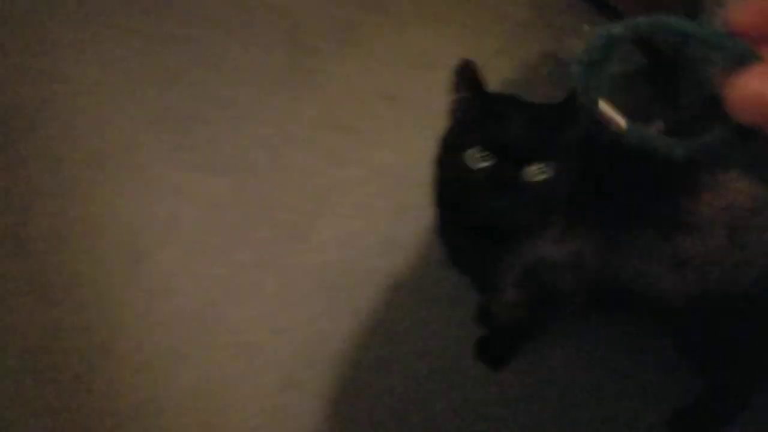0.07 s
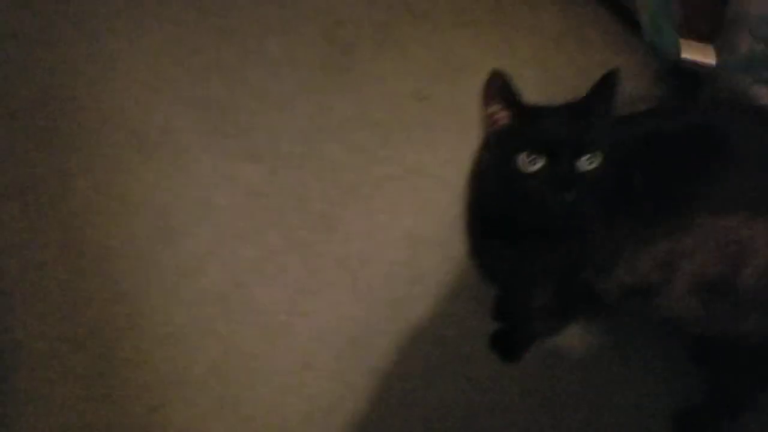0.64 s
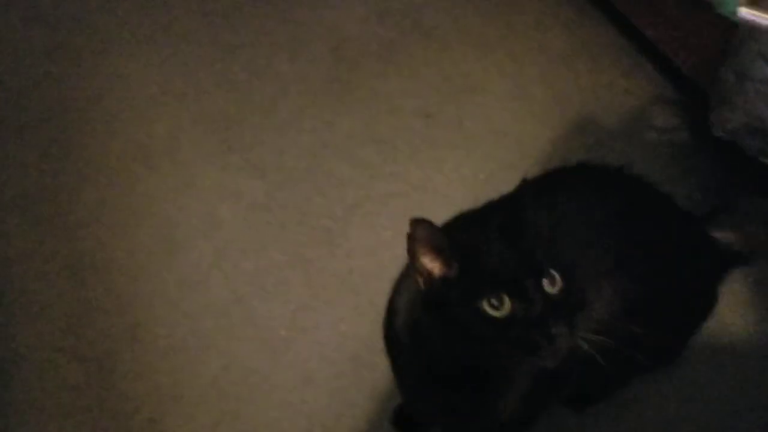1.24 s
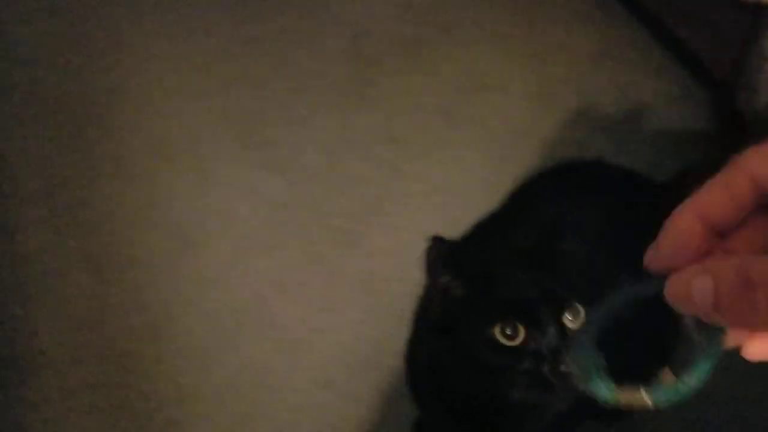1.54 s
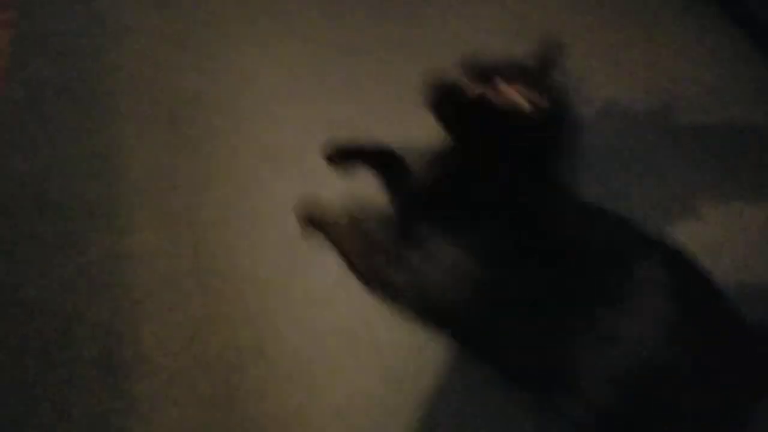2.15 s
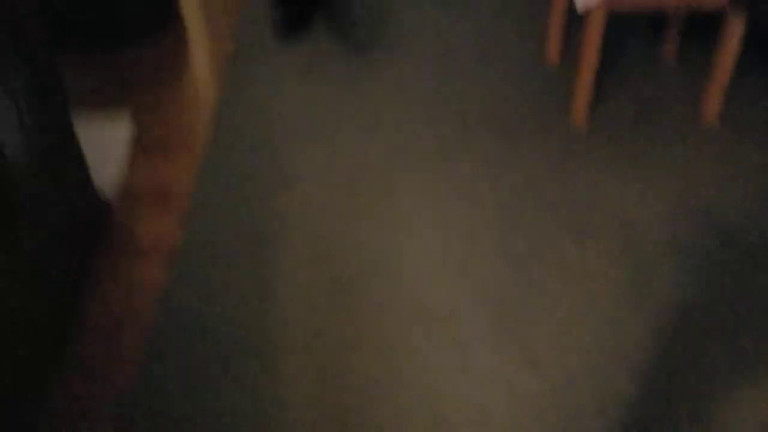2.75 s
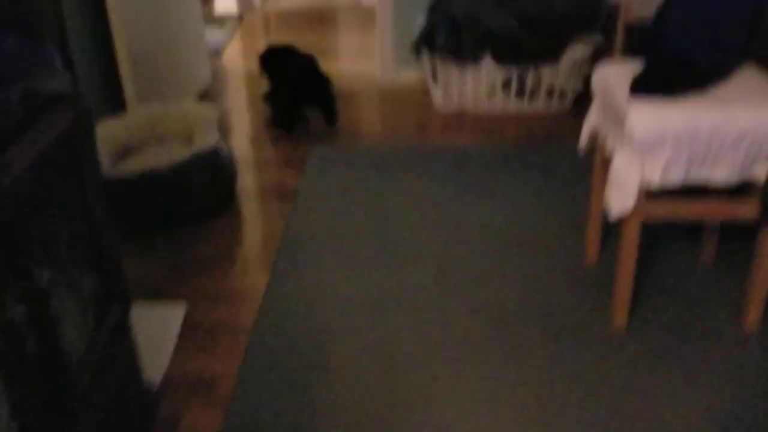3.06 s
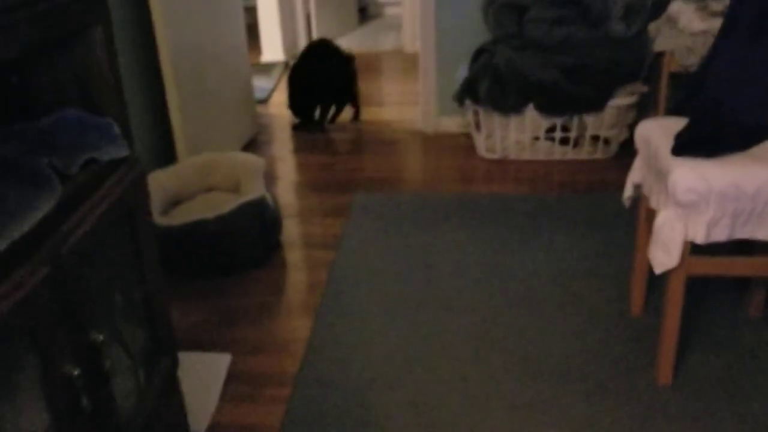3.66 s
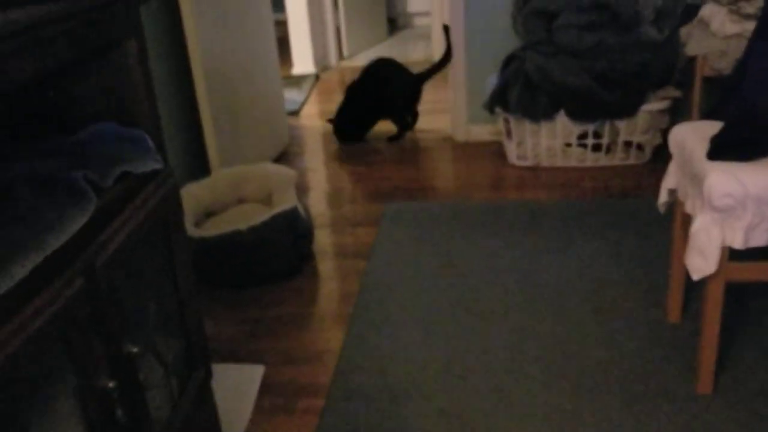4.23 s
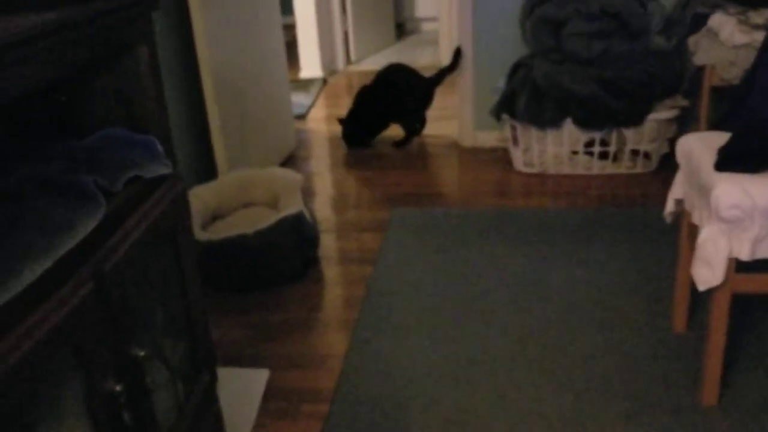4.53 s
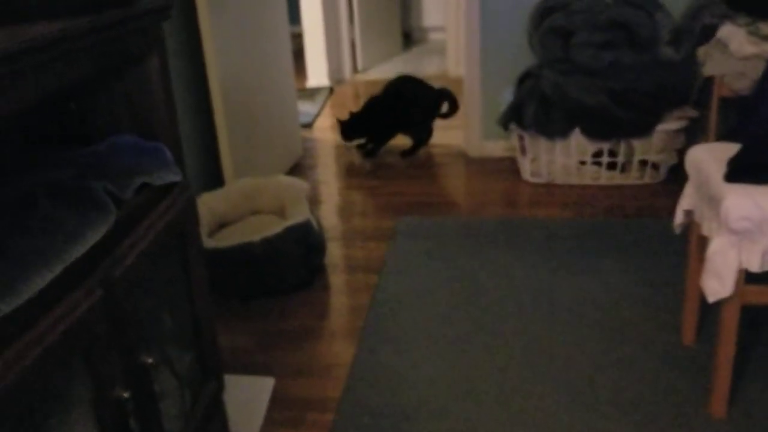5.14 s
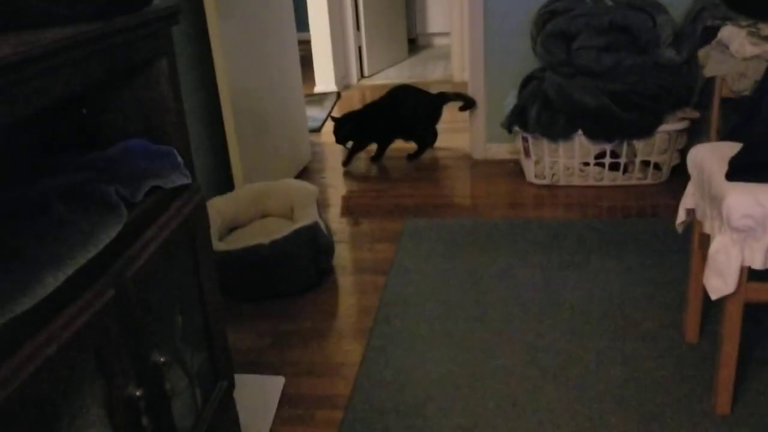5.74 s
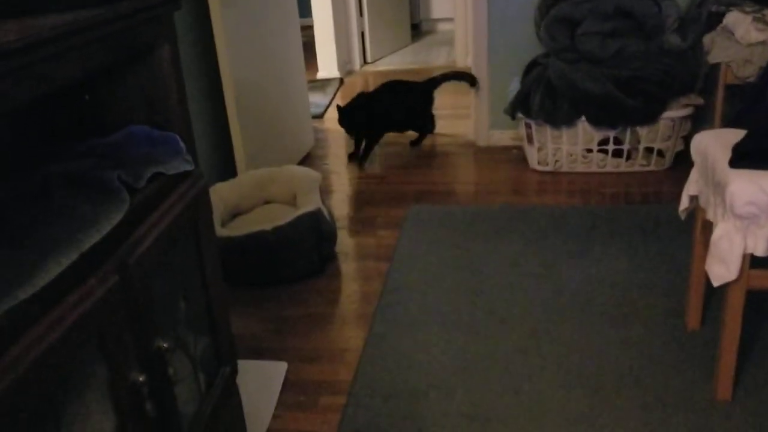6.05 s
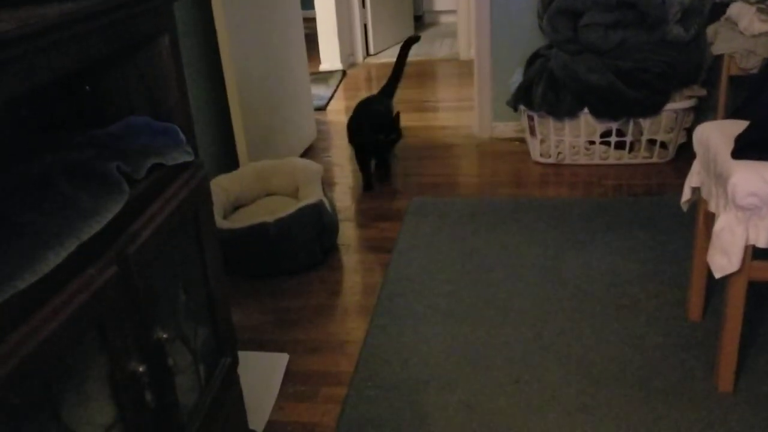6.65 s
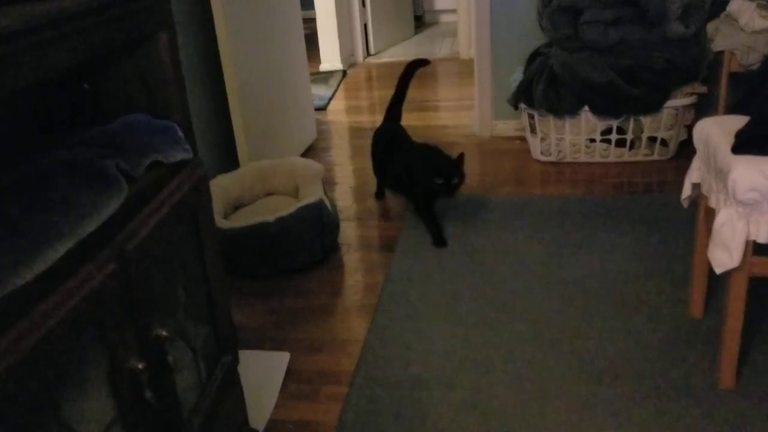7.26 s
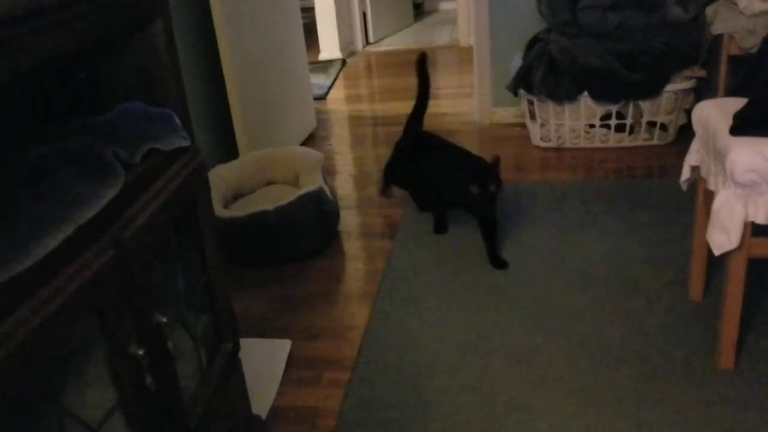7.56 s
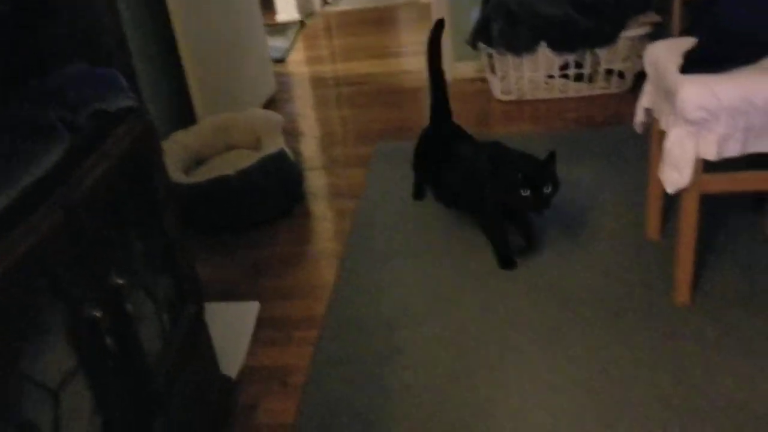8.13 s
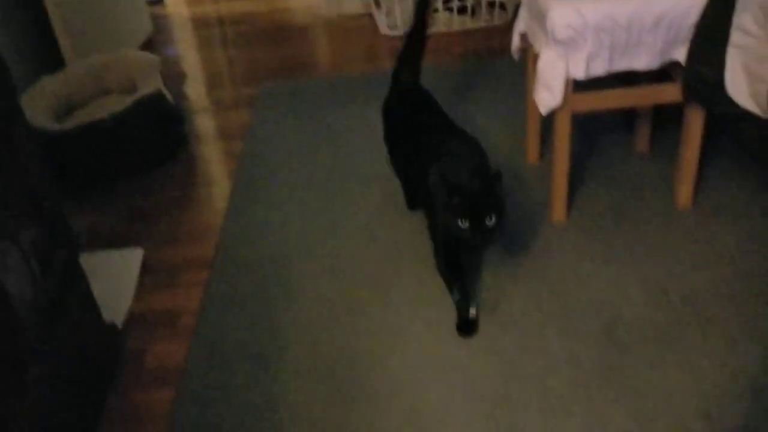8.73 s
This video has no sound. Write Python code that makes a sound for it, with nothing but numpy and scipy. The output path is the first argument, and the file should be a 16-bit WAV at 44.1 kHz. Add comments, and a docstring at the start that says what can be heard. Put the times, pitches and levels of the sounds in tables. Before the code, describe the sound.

In a small, quiet living room a cat gives one short, falling chirp that ends in a rasp. A moment later it gallops across booming floorboards with knocks and clicks, and a thrown toy clacks onto the wood. Clothing rustles close to the hand-held stereo microphone. The cat then pads back with a few soft thumps and faint squeaks over a low hum.

```python
"""A cat chirps once, then gallops over booming floorboards as a thrown toy clacks down.
The chirp, at the toy held above the carpet, is a falling vocal-fold tone shaped by the mouth; it ends in rasp.
Paws set the boards swinging, the toy rings briefly, and the cat pads back among a few soft knocks.
Cloth rustle, faint squeaks, a far whine and a low hum fill a small, quiet living room,
heard through a hand-held stereo microphone."""
import sys
import numpy as np
from scipy import signal
from scipy.fft import rfft, irfft, next_fast_len
from scipy.io import wavfile

SR = 44100
rng = np.random.default_rng(int(sys.argv[2]) if len(sys.argv) > 2 else 0)


def to_wav(s):
    """Save 16-bit WAV."""
    ch = np.atleast_2d(s).T  # columns
    pcm = np.round(np.clip(ch, -1, 1) * 32767)  # PCM
    wavfile.write(sys.argv[1], SR, pcm.astype(np.int16))


N = 387638
TIME = np.arange(N) / SR

# woody knock spectrum (frequency / centre, density [dB])
KNOCK_SPECTRUM = [(.2, -3.5), (.6, -3.5), (.87, 0), (1, 4), (1.15, -0.5), (1.6, -13), (3, -27), (12, -74)]


def chirp(jitter=0.072, shimmer_db=3.5, rasp_db=-4, crack_ratio=1.42, mouth_db=10, mouth_width_hz=330):
    """Vocal folds glide down as the mouth opens and closes; they flutter early and break up at the end."""
    # throat and mouth response (frequency [Hz], gain [dB])
    throat = [(400, -20), (660, -8), (1000, -15), (1350, -11.5), (1800, 4), (2020, 2.5), (2350, -12),
              (2700, -15), (3200, -26), (3850, -22), (4500, -26), (6000, -17), (7300, -33.5), (15000, -55)]
    # fold pitch: sags, lifts at the break (time [s], pitch [Hz])
    pitch_curve = [(0.912, 746), (0.924, 730.5), (0.94, 677), (0.948, 692), (0.996, 650), (1.014, 614),
                   (1.038, 609), (1.052, 638.6), (1.075, 657)]
    # upper mouth resonance, moved by the jaw (time [s], frequency [Hz])
    mouth_curve = [(.912, 4550), (.924, 3570), (.95, 3450), (.966, 5100), (.98, 5230), (.99, 3950),
                   (1.016, 3660), (1.04, 5900)]
    wobble_hz, wobble_depth = 38.7, 0.017
    main_hz, main_width_hz, closed_db = 1960, 240, -16
    live, level, rough, bright_db = voice_controls()
    wobble = wobble_depth * np.cos(2 * np.pi * wobble_hz * (TIME - 0.87))
    pitch_hz = in_time(pitch_curve)[0] * (1 + wobble)
    jittered_hz = pitch_hz * (1 + jitter * rough * drift(700))
    phase = 2 * np.pi * np.cumsum(jittered_hz[live]) / SR
    k = np.arange(1, 23)[:, None]
    hz = k * pitch_hz[live]
    mouth_hz = in_time(mouth_curve)[0][live]
    lift_db = mouth_db / (1 + ((hz - mouth_hz) / mouth_width_hz) ** 2)
    # main resonance muffled until the mouth opens
    closed = 1 - step_up(0.93, 0.0058)[live]
    lift_db += closed_db * closed * np.exp(-((hz - main_hz) / main_width_hz) ** 2)
    upper = at_hz([(2200, 0.081), (3000, 0.88)], hz)
    shimmer = np.array([drift(54.95)[live] for _ in k])
    gains = from_db(at_hz(throat, hz) + lift_db + upper * (bright_db[live] + shimmer_db * shimmer))
    gains /= np.sqrt(np.sum(gains ** 2, axis=0) / 2)
    tone = np.sum(gains * np.sin(k * phase + rng.uniform(0, 2 * np.pi, k.shape)), axis=0)
    # brighter turbulence, one puff per fold opening
    air_spectrum = [(f, db + 9 * (f > 3000)) for f, db in throat]
    air = noise(air_spectrum, N)[0][live] * (1 + np.cos(phase))
    # in the rasp, a wavering tone between the harmonics takes over
    crack_phase = crack_ratio * phase + 0.7 * drift(300)[live]
    crack = from_db(-1) * swell(1.059, 0.011)[live] * np.sqrt(2) * np.sin(crack_phase)
    voice = np.zeros(N)
    voice[live] = tone * (1 - 0.85 * rough[live]) + from_db(rasp_db) * rough[live] * air + crack
    return voice_in_room(voice * level)


def voice_controls(start_s=0.909, end_s=1.068, attack_s=0.0084, release_t60_s=0.13, trill_hz=31.5):
    """The throbbing call catches briefly, runs clear, then breaks and dies; rougher is brighter."""
    # vocal effort (time [s], level [dB])
    effort = [(.914, -45.5), (.943, -41), (.957, -35.5), (.97, -33.5), (1.01, -37.5), (1.038, -42.5),
              (1.068, -48)]
    live = (TIME > start_s) & (TIME < end_s + release_t60_s)
    flutter = swell(0.936, 0.0063)
    broken = step_up(1.043, 0.0051)
    rough = np.clip(0.078 + 0.25 * flutter + broken, 0, 1)
    bright_db = -2 + 18 * flutter + 3 * broken
    attack = np.clip((TIME - start_s) / attack_s, 0, 1)
    release = fade(np.maximum(TIME - end_s, 0), release_t60_s)
    trill_db = 2 * np.cos(2 * np.pi * trill_hz * (TIME - 0.969))
    level = from_db(in_time(effort)[0] + trill_db) * attack * release
    return live, level, rough, bright_db


def voice_in_room(voice, room_db=-22.5, treble_room_db=-14.5):
    """Direct voice, early echoes and tail; small surfaces return only the treble."""
    # echoes off floor, legs and furniture (delay [s], gain [dB])
    echoes = [(.0011, -32), (.0029, -4.5), (.0053, -16), (.0094, -15)]
    treble = signal.sosfilt(signal.butter(2, 2800, "high", fs=SR, output="sos"), voice + 1e-18)
    early = sum(from_db(db) * delayed(treble, lag_s) for lag_s, db in echoes)
    tail = from_db(room_db) * room(voice) + from_db(treble_room_db) * room(treble)
    return head_on(voice + early, left_db=6.5, shade_hz=3800) + tail * pan(6.4)


def footfalls(push_s=0.0053, hollow_hz=199, hollow_t60_s=0.28, hollow_rise_s=0.0022, firm_db=-29):
    """Paws set the boards swinging at a pitch that depends on the spot; firm steps add a hollow note."""
    # paw impacts (time [s], board pitch [Hz], level [dB], t60 [s])
    steps = [(1.899, 76, -35.5, 0.12), (1.942, 70, -38, 0.14), (2.022, 66, -34, 0.12),
             (2.076, 85, -37.5, .12), (2.287, 212, -41, 0.17), (2.367, 104, -31, 0.074),
             (2.432, 142, -34.5, 0.19), (2.464, 56.8, -34, 0.26), (2.578, 175, -38.5, 0.19),
             (2.655, 91, -36.5, 0.27), (2.666, 55.1, -35, 0.55), (2.751, 101, -35.5, 0.22),
             (2.843, 109.6, -29, 0.48), (2.904, 110.6, -23.5, 0.28), (2.976, 100.8, -28.5, 0.31),
             (3.024, 116, -32, 0.12), (3.484, 215, -52.5, 0.21), (3.903, 201, -51, .25),
             (4.115, 184, -53.5, .15), (6.142, 112.4, -40, 0.3), (6.698, 100, -43, 0.19),
             (7.06, 99, -44.5, .11), (7.414, 91, -42.5, 0.25), (8.187, 73.5, -40.5, 0.13)]
    out, t = np.zeros((2, N)), TIME[:SR // 2]
    for s, hz, db, t60_s in steps:
        boom = from_db(db) * np.sin(2 * np.pi * hz * t) * fade(t, t60_s) * rise(t, push_s)
        hollow_db = -41 + 1.56 * min(db - firm_db, 0)
        hollow = from_db(hollow_db) * burst(KNOCK_SPECTRUM, hollow_hz, hollow_t60_s, t)
        add(out, s, boom + hollow * rise(t, hollow_rise_s))
    return from_left(out * pan(4.4), lag_s=0.00013)


def knocks(knock_t60_s=0.21, slap_t60_s=0.34, rise_s=0.0012, second_touch_s=0.022, second_touch_db=-7):
    """Each contact: a woody knock under a brighter slap, then a lighter second touch."""
    # hard paw contacts, soft knocks about the room (time [s], knock [Hz], knock [dB], slap [Hz], slap [dB])
    contacts = [(1.875, 394, -44.5, 890, -52), (2.288, 320, -54.5, 1140, -54.5),
                (2.347, 293, -42, 600, -68), (2.407, 565, -46.5, 1140, -46.5), (2.654, 830, -50, 1350, -54),
                (2.838, 210, -44, 1200, -58), (2.906, 592, -46, 700, -58), (3.025, 299, -47, 1030, -54),
                (6.807, 910, -79, 2200, -64), (7.961, 477, -61, 1380, -57.5),
                (8.617, 536, -55, 1350, -58.5)]
    # slap spectrum (frequency / centre, density [dB])
    slap_spectrum = [(.15, 0.5), (.5, 5.5), (1, -1), (1.5, -6), (2.2, -11.5), (3.2, -16), (6, -25),
                     (9, -49), (16, -41)]
    out, t = np.zeros((2, N)), TIME[:SR // 2]
    for s, knock_hz, knock_db, slap_hz, slap_db in contacts:
        for late_s, touch_db in ((0, 0), (second_touch_s, second_touch_db)):
            knock = from_db(knock_db) * burst(KNOCK_SPECTRUM, knock_hz, knock_t60_s, t)
            slap = from_db(slap_db) * burst(slap_spectrum, slap_hz, slap_t60_s, t)
            add(out, s + late_s, from_db(touch_db) * (knock + slap) * rise(t, rise_s))
    return from_left(out * pan(4.4), lag_s=0.0002)


def toy(contact_t60_s=0.018, ring_db=-9, ring_t60_s=0.25, room_db=-5):
    """The toy hits bare boards; its many close modes ring briefly."""
    # landing and bounces (time [s], level [dB])
    hits = [(2.826, -37.5), (2.8327, -38), (2.837, -42)]
    # clack spectrum (frequency [Hz], density [dB])
    spectrum = [(300, -14), (550, 6.5), (900, -11), (1100, -5), (1600, -23), (2350, 2), (3300, 0),
                (4200, 0.5), (4900, -7), (6200, 5.5), (8200, -12), (10000, -4.5), (11300, -16),
                (13000, -2.5), (16000, -14)]
    out, t = np.zeros((2, N)), TIME[:SR // 3]
    envelope = fade(t, contact_t60_s) + from_db(ring_db) * fade(t, ring_t60_s)
    for s, db in hits:
        add(out, s, from_db(db) * noise(spectrum, len(t)) * envelope)
    return out * pan(7.9) + from_db(room_db) * room(out) * pan(7.8)


def clicks(t60_s=0.0096, room_db=-8):
    """Small hard contacts, each a few milliseconds of broad resonance."""
    # mouth, claw and toy clicks (time [s], level [dB], tilt [dB/octave])
    contacts = [(0.812, -54, -5), (1.958, -56.5, 2), (1.999, -57, 8), (2.134, -48.5, 1.5), (2.213, -53, 5),
                (2.2773, -40.5, -6), (2.2799, -32.5, -1.5), (2.395, -52, -18), (2.4081, -48, -1.5)]
    # click spectrum before tilt (frequency [Hz], density [dB])
    spectrum = [(400, -28), (1000, -14.5), (1900, 1.5), (3000, -2.5), (3900, -1), (5500, 1.5), (7000, -12),
                (9000, -23), (15000, -18)]
    out, t = np.zeros(N), TIME[:SR // 20]
    for s, db, tilt_db in contacts:
        tilted = [(hz, density_db + tilt_db * np.log2(hz)) for hz, density_db in spectrum]
        add(out, s, from_db(db) * burst(tilted, 1, t60_s, t)[0])
    return head_on(out, left_db=11.0, shade_hz=4500) + from_db(room_db) * room(out) * pan(8.5)


def rustle(grain_db=1.1):
    """Cloth slides in fine grains close to the left port."""
    # clothing moving with the throw (time [s], level [dB])
    levels = [(0, -70.5), (.35, -79), (.8, -70.5), (1.68, -70), (2.05, -59.5), (2.6, -69.5), (3.02, -53.5),
              (3.33, -63), (3.52, -73.5), (3.66, -67.5), (3.85, -83), (8.2, -83.5), (8.79, -76)]
    # cloth spectrum (frequency [Hz], density [dB])
    spectrum = [(400, 4.5), (1200, -4), (2300, -1), (3300, -8.5), (4500, -1.5), (6200, -1), (8000, -12.5),
                (11000, -13.5), (16000, -9)]
    return noise(spectrum, N) * from_db(in_time(levels)[0] + grain_db * drift(180)) * from_db([[0], [-10]])


def squeaks(flutter_db=2.0):
    """Uneven friction swells and fades in one narrow resonance."""
    # faint squeaks and scuffs (time [s], length [s], frequency [Hz], level [dB], sharpness)
    scuffs = [(1.235, 0.14, 2450, -66, 5), (4.95, 0.41, 4400, -80.5, 7), (5.9, .45, 2050, -75.5, 4),
              (5.985, 0.21, 2850, -75, 24), (6.347, 0.24, 2220, -75, 9), (6.572, 0.11, 2260, -70, 7),
              (7.63, 0.11, 2160, -66, 10), (8.517, .14, 2230, -64.5, 12)]
    out = np.zeros(N)
    friction = rng.standard_normal(N) * from_db(flutter_db * drift(120))
    for s, length_s, hz, db, sharpness in scuffs:
        near = np.abs(TIME - s) < length_s
        b, a = signal.iirpeak(hz, sharpness / 2, fs=SR)
        tone = rms_one(signal.lfilter(b, a, signal.lfilter(b, a, friction[near])))
        out[near] += from_db(db) * tone * swell(s, length_s / 2)[near]
    return out * from_db([[-2], [-17]])


def whine():
    """Thin band of fan noise from an appliance beyond the doorway, mostly left."""
    # fan spectrum (frequency [Hz], density [dB])
    spectrum = [(300, -29), (1050, -12.5), (1400, -10), (1560, 0), (1720, -12), (2100, -9.5), (2600, -20),
                (6000, -50)]
    # louder as the microphone faces it (time [s], level [dB])
    levels = [(2.8, -80), (3.4, -76.5), (7.9, -77.5), (8.6, -80)]
    return noise(spectrum, N) * from_db(in_time(levels)[0]) * from_db([[0], [-11]])


def background(rumble_db=-60.5, hiss_db=-71.5, waver_db=2.0, waver_rad=0.84):
    """House rumble, a wavering hum and each microphone's own hiss."""
    # house hum (frequency [Hz], level [dB])
    hum_tones = [(118.4, -69), (161.5, -70.5)]
    # room rumble (frequency [Hz], density [dB])
    rumble_spectrum = [(15, -29), (28, -17.5), (40, -4.5), (54, 5), (70, 1.5), (112, 0), (175, -9),
                       (280, -10), (380, -23.5), (480, -22), (800, -35.5), (1350, -33.5), (2000, -35),
                       (3000, -46), (6000, -88)]
    # microphone hiss (frequency [Hz], density [dB])
    hiss_spectrum = [(500, 8), (2500, -1), (4000, -4), (6500, -10.5), (8000, -18), (9500, -9.5), (11000, 2),
                     (13000, 5), (16000, 3)]
    hum = np.zeros(N)
    for hz, db in hum_tones:
        amplitude = np.sqrt(2) * from_db(db + waver_db * drift(6))
        hum += amplitude * np.sin(2 * np.pi * hz * TIME + waver_rad * drift(4.5))
    rumble = from_db(rumble_db) * noise(rumble_spectrum, N)
    hiss = from_db(hiss_db) * noise(hiss_spectrum, N, coherence=[(20, 0.0049), (20000, 0.0048)])
    return from_left(rumble + hum, lag_s=0.00014) * pan(7.05) + hiss * pan(1.1)


def room(x, build_s=0.0084):
    """Reflections thicken into a diffuse tail whose treble dies first."""
    # room decay (frequency [Hz], t60 [s])
    decay = [(100, 0.55), (500, 0.45), (2000, 0.34), (6000, 0.15), (14000, 0.09)]
    t = TIME[:SR // 2]
    hz, frames_s, cells = signal.stft(noise([(20, 0), (20000, 0)], len(t)), SR, nperseg=256)
    cells *= fade(frames_s, at_hz(decay, hz)[:, None])
    tail = signal.istft(cells, SR)[1][:, :len(t)]
    tail = rms_one(tail * (1 - np.exp(-(t / build_s) ** 2))) / np.sqrt(len(t))
    return signal.fftconvolve(np.atleast_2d(x), tail, axes=1)[:, :N]


def head_on(x, left_db, shade_hz, leak=0.22):
    """Direct sound: the right port faces away, losing level and most treble."""
    shaded = signal.sosfiltfilt(signal.butter(2, shade_hz, fs=SR, output="sos"), x + 1e-18)
    return np.array([x, shaded + leak * (x - shaded)]) * pan(left_db)


def from_left(x, lag_s):
    """Sound from the left reaches the right port later."""
    return np.array([x[0], delayed(x[1], lag_s)])


def burst(spectrum, centre_hz, t60_s, t):
    """Close modes around a centre die together; same energy at every blow."""
    envelope = fade(t, t60_s)
    modes = noise([(ratio * centre_hz, db) for ratio, db in spectrum], len(t))
    return rms_one(modes * envelope) * np.sqrt(np.mean(envelope ** 2))


def noise(spectrum, size, coherence=None):
    """Coloured stereo noise of unit power; by default the channels are alike in the bass."""
    # room sound at the two ports (frequency [Hz], left-right coherence)
    room_coherence = [(30, 0.37), (100, 0.91), (300, 0.85), (1500, 0), (14000, 0.062)]
    padded = next_fast_len(size)
    hz = np.arange(padded // 2 + 1) * SR / padded
    mid, side = rfft(rng.standard_normal((2, padded)))
    alike = at_hz(coherence or room_coherence, hz)
    both = np.sqrt(1 + alike) * mid + np.sqrt(1 - alike) * side * [[1], [-1]]
    return rms_one(irfft(both * from_db(at_hz(spectrum, hz)), padded)[:, :size])


def drift(rate_hz):
    """Slow random curve of unit power."""
    knots = rng.standard_normal(int(N / SR * rate_hz) + 2)
    return rms_one(np.interp(TIME * rate_hz, np.arange(len(knots)), knots))


def fade(t, t60_s):
    """Exponential decay."""
    return np.exp(-np.log(1000) * t / t60_s)


def rise(t, tau_s):
    """Exponential approach to 1."""
    return 1 - np.exp(-t / tau_s)


def swell(centre_s, width_s):
    """Gaussian bump of height 1."""
    return np.exp(-((TIME - centre_s) / width_s) ** 2)


def step_up(centre_s, width_s):
    """Smooth step from 0 to 1."""
    return (1 + np.tanh((TIME - centre_s) / width_s)) / 2


def from_db(db):
    """Decibels to gain."""
    return 10 ** (np.asarray(db) / 20)


def rms_one(x):
    """Scale to unit power."""
    return x / np.sqrt(np.mean(x ** 2) + 1e-20)


def in_time(rows):
    """Each column of a curve at every sample."""
    s, *columns = np.transpose(rows)
    return [np.interp(TIME, s, c) for c in columns]


def at_hz(points, hz):
    """Interpolate on a log-frequency axis."""
    f, value = np.transpose(points)
    return np.interp(np.log(np.maximum(hz, 1)), np.log(f), value)


def pan(left_db):
    """Channel gains, left louder by left_db."""
    return from_db(np.array([[left_db], [-left_db]]) / 2)


def delayed(x, lag_s):
    """Fractional delay."""
    return np.interp(TIME - lag_s, TIME, x, left=0)


def add(out, start_s, sound):
    """Mix a sound in at a time."""
    i = round(start_s * SR)
    out[..., i:i + sound.shape[-1]] += sound[..., :N - i]


def scene():
    """Everything in the room."""
    return chirp() + footfalls() + knocks() + clicks() + toy() + rustle() + squeaks() + whine() + background()


def record(dry, cutoff_hz=15800):
    """Steep low-pass."""
    return signal.sosfilt(signal.ellip(12, .1, 80, cutoff_hz, fs=SR, output="sos"), dry)


dry = scene()
out = record(dry)
to_wav(out)
```